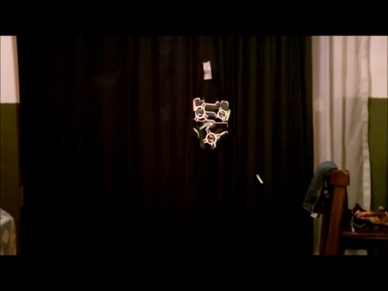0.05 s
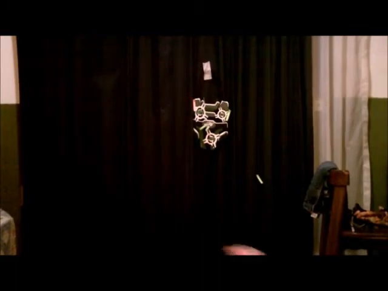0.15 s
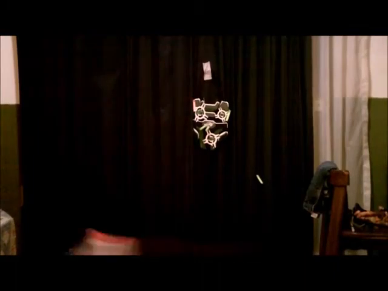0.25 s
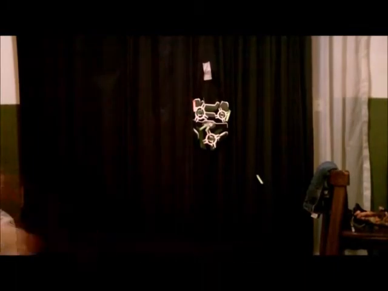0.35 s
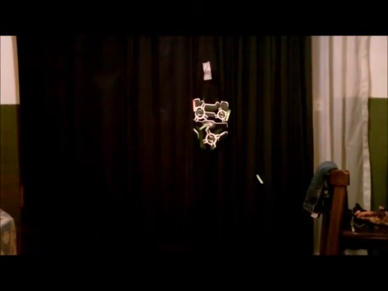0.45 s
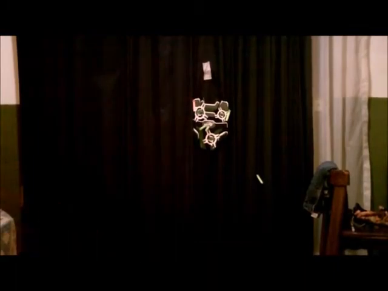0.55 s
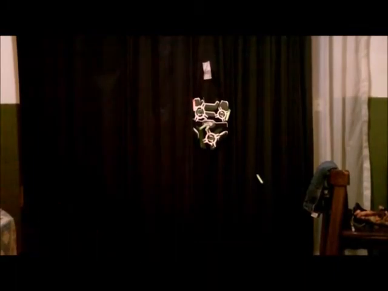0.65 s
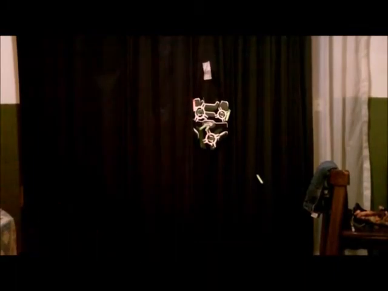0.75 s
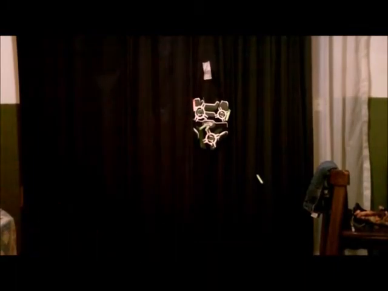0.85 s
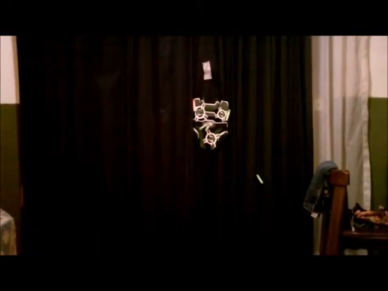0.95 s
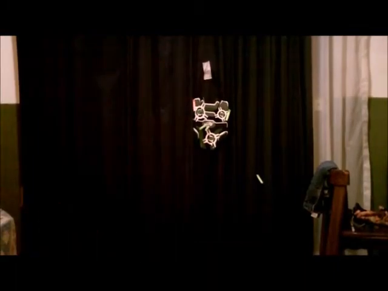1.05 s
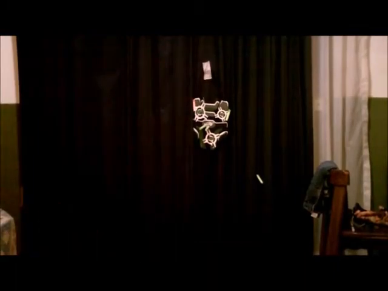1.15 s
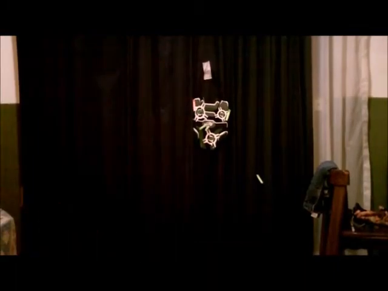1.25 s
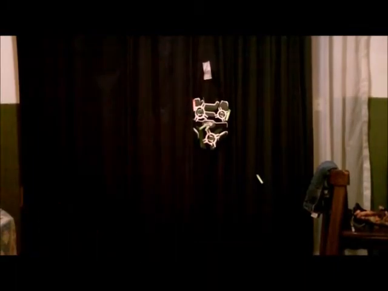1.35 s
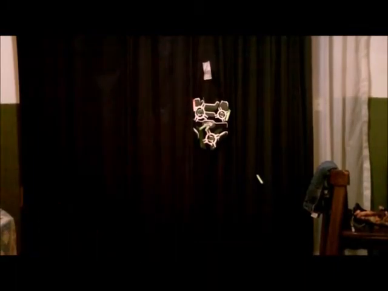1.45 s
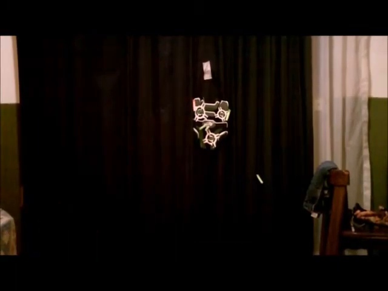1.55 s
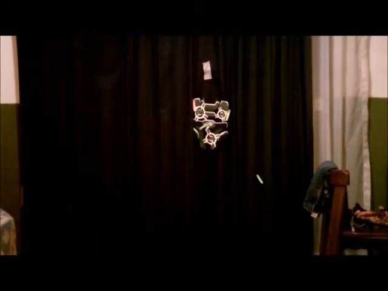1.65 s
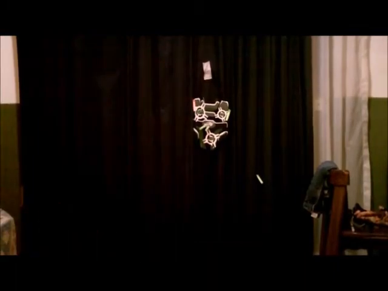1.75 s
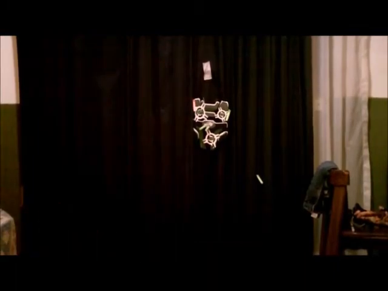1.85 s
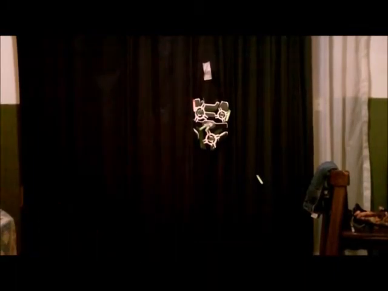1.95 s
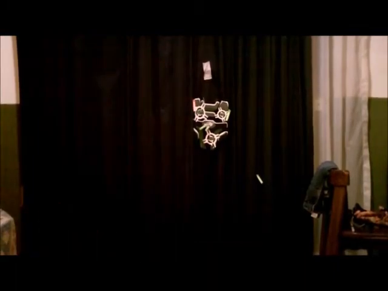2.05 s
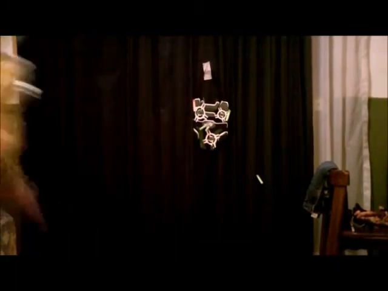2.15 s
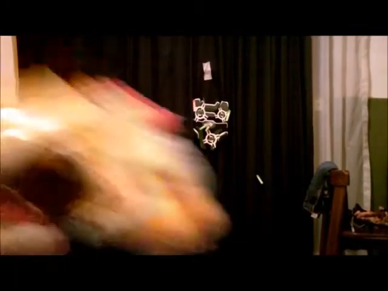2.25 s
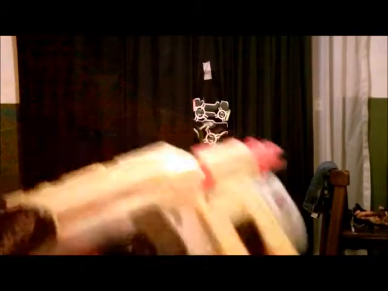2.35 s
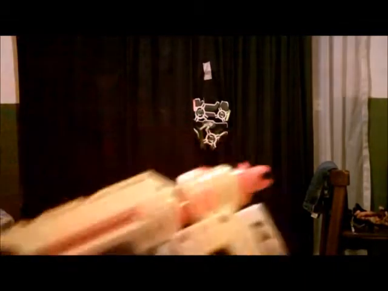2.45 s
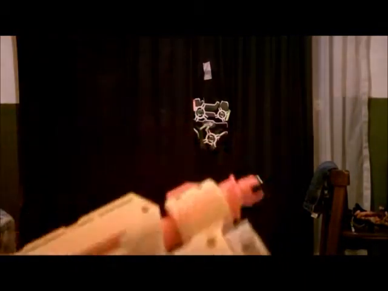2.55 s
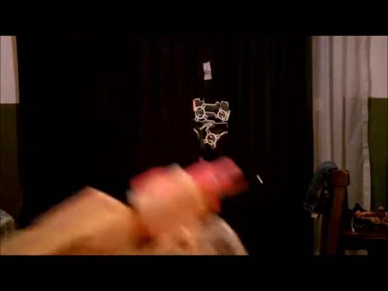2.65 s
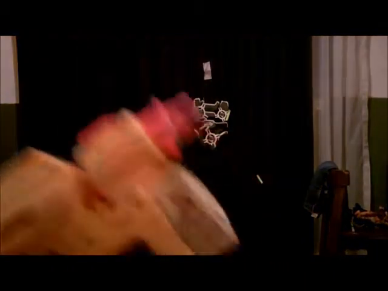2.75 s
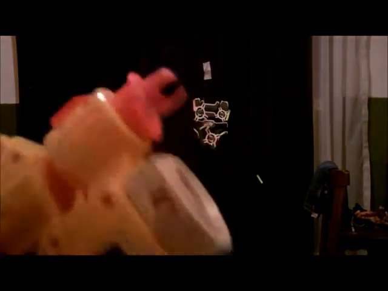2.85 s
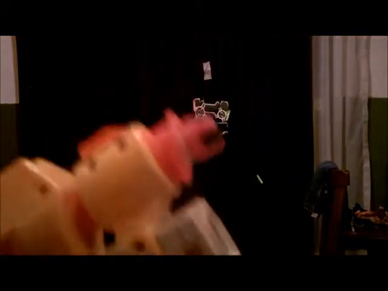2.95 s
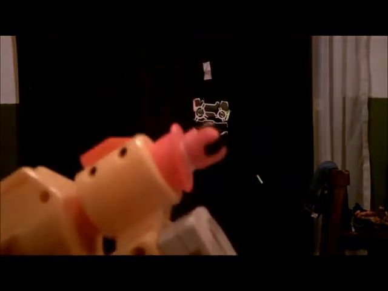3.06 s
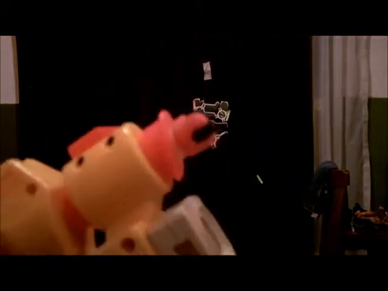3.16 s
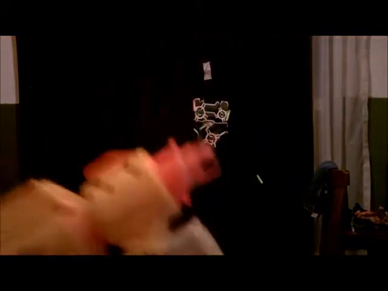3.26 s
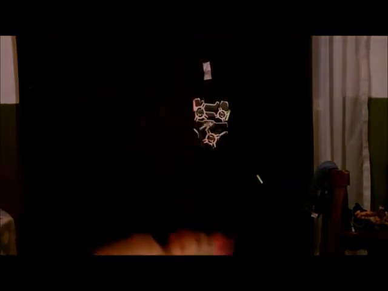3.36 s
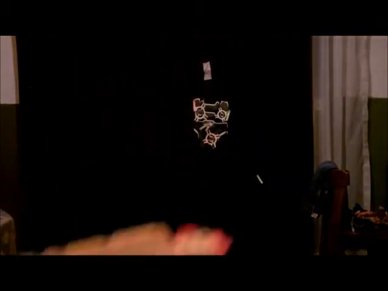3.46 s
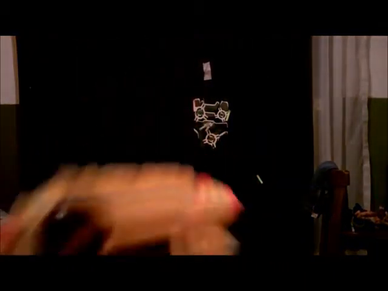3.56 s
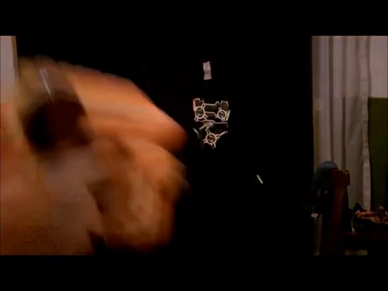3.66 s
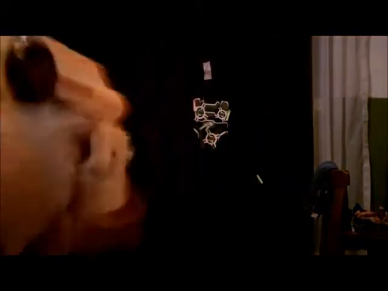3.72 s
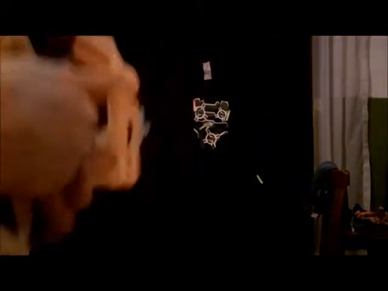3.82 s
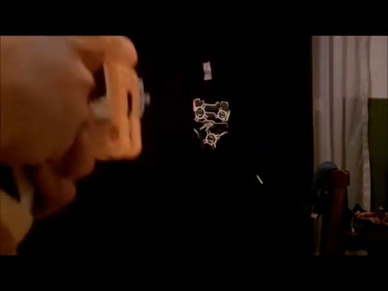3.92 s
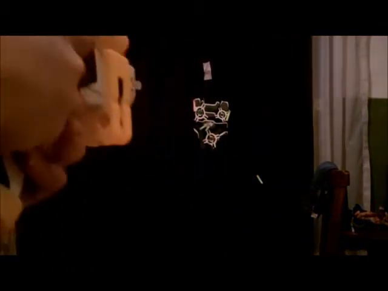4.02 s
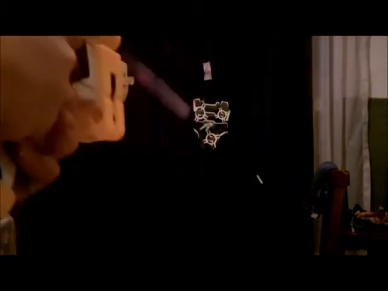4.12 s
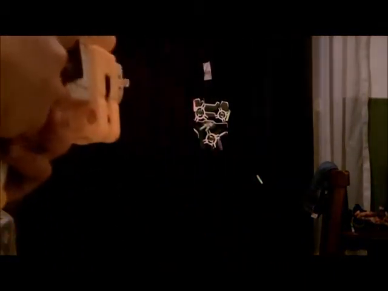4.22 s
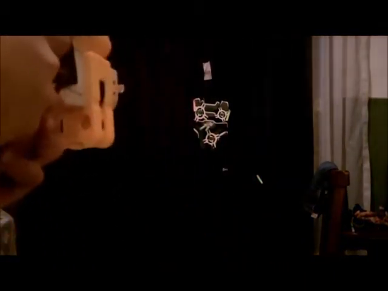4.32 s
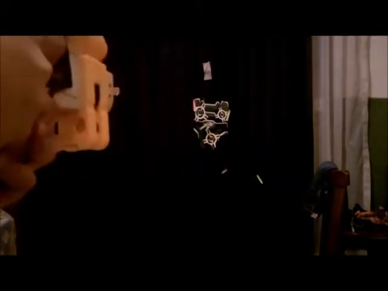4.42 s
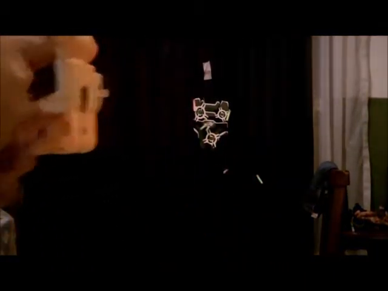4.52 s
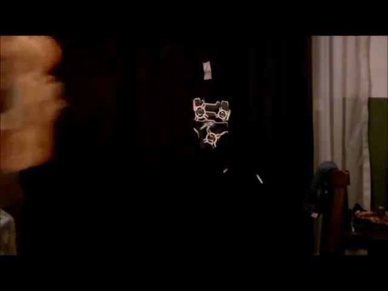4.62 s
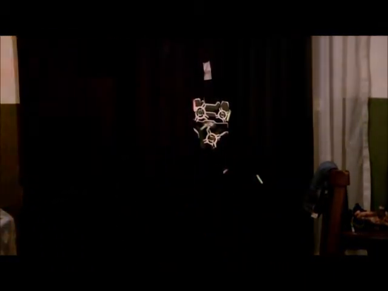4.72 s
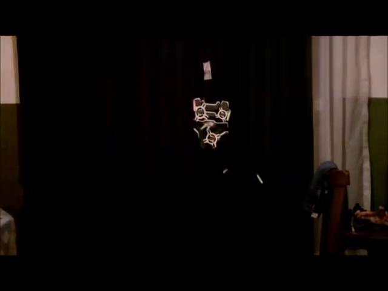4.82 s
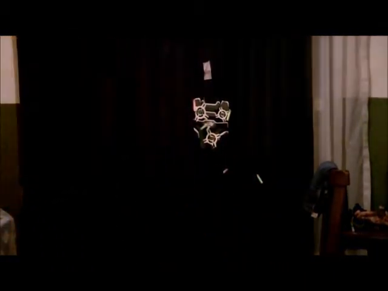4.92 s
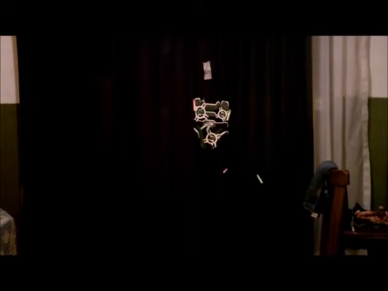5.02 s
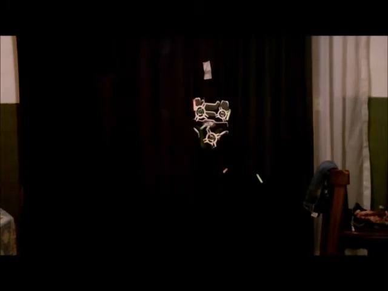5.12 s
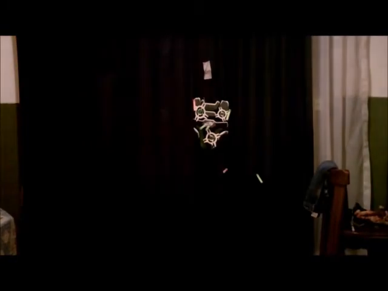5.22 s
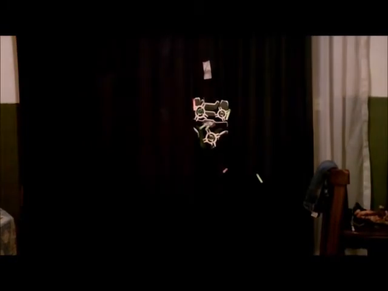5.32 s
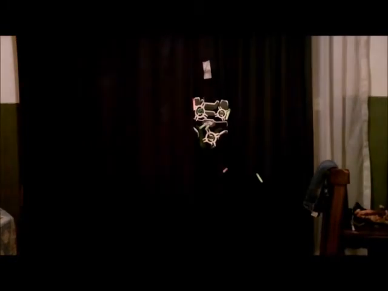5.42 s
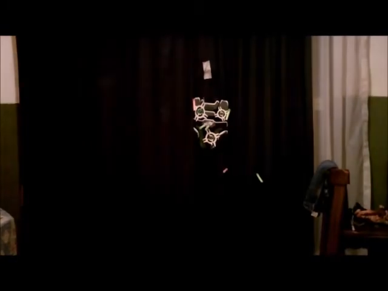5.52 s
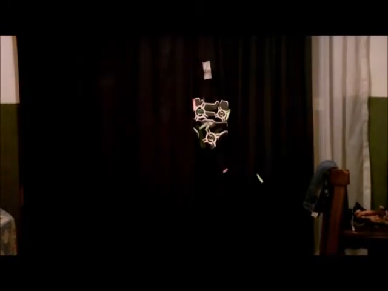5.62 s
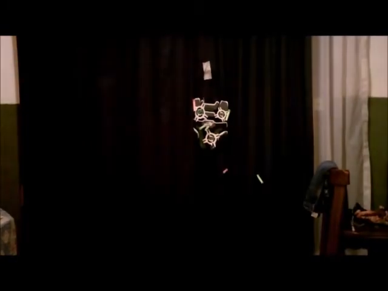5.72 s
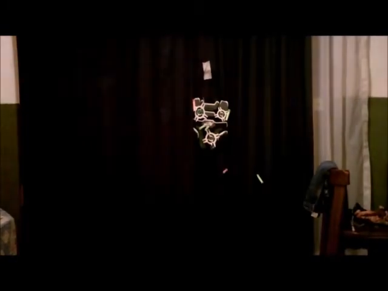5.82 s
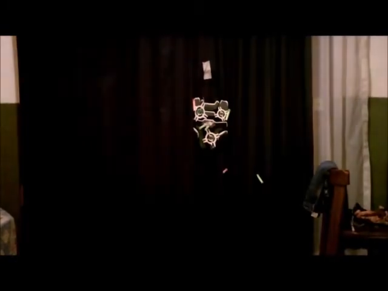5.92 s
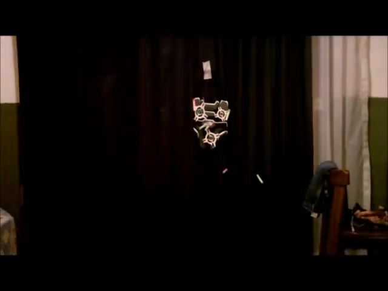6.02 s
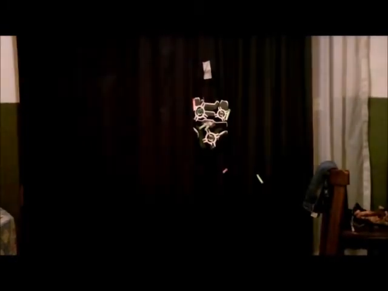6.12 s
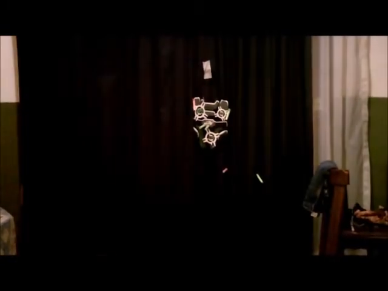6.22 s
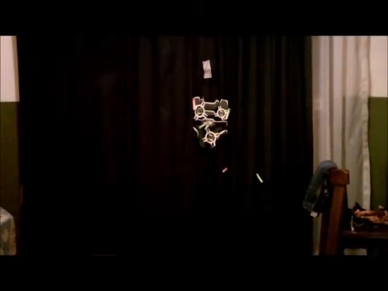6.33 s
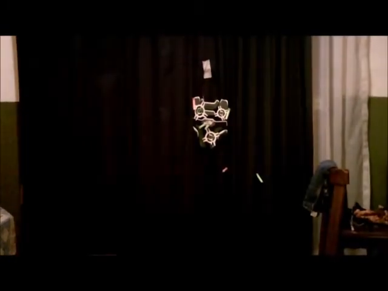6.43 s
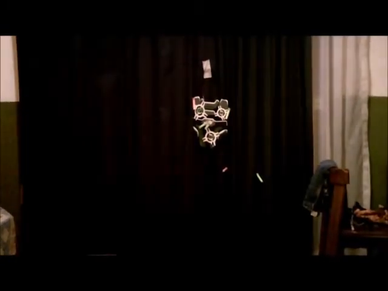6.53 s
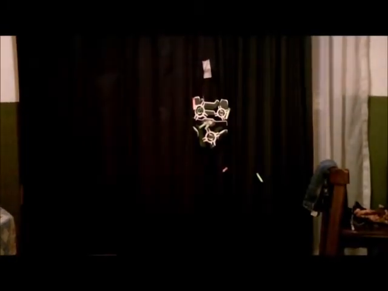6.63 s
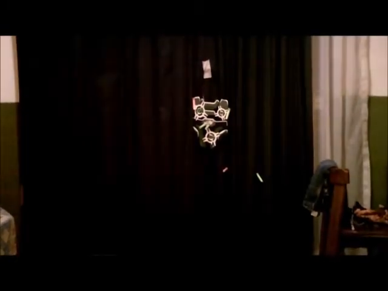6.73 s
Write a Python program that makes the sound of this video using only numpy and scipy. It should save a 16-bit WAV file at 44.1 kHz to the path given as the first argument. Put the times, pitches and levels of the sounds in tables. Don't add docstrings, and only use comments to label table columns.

```python
import sys
import numpy as np
from scipy import signal
from scipy.fft import rfft, irfft
from scipy.io import wavfile
from scipy.ndimage import uniform_filter1d

SR = 44100
rng = np.random.default_rng(int(sys.argv[2]) if len(sys.argv) > 2 else 0)


def file_out(sig):
    cols = np.atleast_2d(sig).T
    lim = np.clip(cols, -1, 1)
    pcm = np.round(lim * 32767).astype(np.int16)
    wavfile.write(sys.argv[1], SR, pcm)


def magnitude_from_level(level_db):
    exponent = np.asarray(level_db, float) / 20
    return 10 ** exponent


N = 298998

# (pitch_hz, level_db, t60_s)
WALLS = (2480, 6760, 7.7), [(4060, 3.5, 0.0039), (4440, -4.5, 0.02), (4725, 3, 0.017), (5123, 1.5, 0.013),
         (6160, -3.5, 0.0019), (6870, -0.5, 0.0019)]
CAVITY = (170, 920, 0), [(452, -10, 0.014), (680, -3, 0.082), (742.4, 9.5, 0.055), (822, 7, 0.018),
          (867, 2, 0.0089)]
PANEL = (1117, 2590, 1.9), [(1127, 1, 0.0092), (1493, -12, 0.041), (1615, -4.5, 0.0092),
         (1910, -10, 0.0075), (2150, -0.5, 0.0041)]
EDGE = (9950, 15100, 0), [(9260, -2.5, 0.0014)]
SKIN = (8000, 16500, -1.5), [(9820, 0, 0.0019)]
FINGER = (5600, 13000, 2), [(9700, -1, 0.002)]


def rms_one(x):
    return x / np.sqrt(np.mean(x ** 2) + 1e-20)


def at_hz(points, hz):
    points_hz, values = np.transpose(points)
    return np.interp(np.log(hz), np.log(points_hz), values)


def over_time(points):
    return np.interp(np.arange(N) / SR, *np.transpose(points))


def drift(rate_hz):
    r = np.exp(-2 * np.pi * rate_hz / SR)
    settled = signal.lfilter([1], [1, -2 * r, r * r], rng.standard_normal(N + SR))[SR:]
    return rms_one(settled)


def band(x, low_hz, high_hz):
    sos = signal.butter(3, [low_hz, min(high_hz, .45 * SR)], "band", fs=SR, output="sos")
    return signal.sosfilt(sos, x)


def ring(x, hz, t60_s):
    r = magnitude_from_level(-60 / (t60_s * SR))
    w = 2 * np.pi * hz / SR
    gain = np.sin(w) * np.sqrt(2 * (1 - r * r))
    return signal.lfilter([0, gain], [1, -2 * r * np.cos(w), r * r], x)


def shell_part(force, part, spread_db):
    (low_hz, high_hz, crack_db), modes = part
    chance = rng.standard_normal((len(force), len(modes)))
    out = magnitude_from_level(crack_db) * np.sqrt(SR / 2 / (high_hz - low_hz)) * force
    for k, (hz, level_db, t60_s) in enumerate(modes):
        out = out + magnitude_from_level(level_db + spread_db * chance[:, [k]]) * ring(force, hz, t60_s)
    return band(out, low_hz, high_hz)


def spread_out(sound):
    power = uniform_filter1d(np.abs(rfft(sound)) ** 2, size=48, axis=1)
    return np.roll(irfft(np.sqrt(np.abs(power))), shift=200, axis=1)


def knocks(rows, parts, swell):
    rows = np.array(rows)
    t = np.arange(6000) / SR
    age = t * 1000 / np.clip(rows[:, -1:], .3, 30)
    force = rng.standard_normal(age.shape)
    if swell:
        uneven = magnitude_from_level(1.5 * rng.exponential(1, age.shape))
        force = force * uneven * age ** 2 * np.exp(-age ** 2 / 2)
    else:
        force = force * np.exp(-age) * (1 - np.exp(-t / 0.0004))
    force = force + 1e-18
    sound = 0
    for k, part in enumerate(parts):
        rung = shell_part(force, part, spread_db=2.5)
        peak = np.abs(rung).max(axis=1, keepdims=True)
        sound = sound + magnitude_from_level(rows[:, [k + 1]]) * rung / peak
    to_room = sound if swell else spread_out(sound)
    out = np.zeros((2, N + len(t)))
    for start_s, *pair in zip(rows[:, 0], sound, to_room):
        i = round(start_s * SR)
        out[:, i:i + len(t)] += pair
    return out[:, :N]


def by_part(rows, panel_share, panel_db):
    start_s, db, weight_db, sharp_db, ms = np.transpose(rows)
    panel = db + panel_share * weight_db + panel_db
    return np.transpose([start_s, db, db + weight_db, panel, db + sharp_db, ms])


def background():
    # pitch_hz, level_db per Hz
    quiet = [(12, -41.5), (20, -2.5), (60, -5.5), (86, -6), (142, -9.5), (293, -15), (499, -22), (976, -24),
             (2670, -33.5), (3950, -29), (5530, -37.5), (13500, -40.5), (16000, -51)]
    # time_s, rumble_db
    sway = [(0.0, -63), (0.15, -62.5), (0.28, -65), (0.91, -65), (1.79, -62), (1.94, -64.5), (2.19, -65),
            (2.98, -63), (3.12, -63.5), (4.17, -62.5), (4.36, -56), (4.55, -63), (4.7, -66), (5.19, -64),
            (5.51, -58), (5.85, -65.5), (6.16, -64), (6.78, -58.5)]
    # time_s, level_db
    whine_db = [(0, -75), (1, -82), (1.3, -89.5), (4.3, -81), (4.5, -62), (5.3, -70), (5.42, -80),
                (5.701, -81), (6.78, -85)]
    # time_s, level_db
    hum_db = [(0, -90), (5.7, -90), (5.95, -71), (6.6, -70), (6.78, -75)]
    hz = np.maximum(np.fft.rfftfreq(N, 1 / SR), 1)
    noise = rms_one(irfft(rfft(rng.standard_normal(N)) * magnitude_from_level(at_hz(quiet, hz)), N))
    rumble = band(noise, 12, 180)
    lumps = magnitude_from_level(over_time(sway) + 63.5 + 2.9 * drift(4))
    hiss = magnitude_from_level(-75) * rms_one(band(rng.standard_normal(N), 11000, 15000))
    whine = magnitude_from_level(over_time(whine_db)) * rms_one(ring(rng.standard_normal(N), hz=1004, t60_s=0.45))
    hum = magnitude_from_level(over_time(hum_db)) * rms_one(ring(rng.standard_normal(N), hz=252, t60_s=0.3))
    return magnitude_from_level(-59.5) * (noise + rumble * (lumps - 1)) + whine + hum + hiss


def bedroom(x):
    # pitch_hz, t60_s
    decay = [(150, 0.13), (600, 0.34), (2000, 0.39), (5000, 0.26), (10000, 0.25), (15000, 0.11)]
    t = np.arange(SR // 2) / SR
    edges_hz = 120 * 2 ** np.arange(0, 7.5, .5)
    echoes = np.zeros(len(t))
    for low_hz, high_hz in zip(edges_hz, edges_hz[1:]):
        t60_s = at_hz(decay, np.sqrt(low_hz * high_hz))
        echoes += band(rng.standard_normal(len(t)), low_hz, high_hz) * magnitude_from_level(-60 * t / t60_s)
    echoes = echoes * np.clip((t - .001) / 0.0054, 0, 1)
    return signal.fftconvolve(x, echoes / np.sqrt(np.sum(echoes ** 2)))[:N]


def thumps():
    # start_s, peak_db, pitch_hz
    pushes = [(1.829, -40, 33), (3.847, -65, 101.5), (4.198, -15, 135), (4.2, -31, 270), (4.42, -26, 202),
              (5.39, -31, 115.4), (5.445, -38, 79.2), (5.556, -30, 192), (6.172, -35, 117.6),
              (6.431, -43, 31.8), (6.719, -38, 88)]
    t = np.arange(4096) / SR
    out = np.zeros(N + len(t))
    for start_s, peak_db, hz in pushes:
        i = round(start_s * SR)
        out[i:i + len(t)] += magnitude_from_level(peak_db - 4) * np.sin(2 * np.pi * hz * t) * np.exp(-t * hz / 0.9)
    return out[:N]


def rub_gains(db, weight_db, skin_db):
    panel_db = db + 0.31 * weight_db - 2.5
    return magnitude_from_level(np.array([db, db + weight_db, panel_db, 0.66 * db + skin_db]))


def rubbing():
    # time_s, pressure_db of the walls, weight_db
    grip = [(0, -77.5, 5), (.35, -66, -20), (.56, -69.5, -16), (.92, -64.5, -5), (1.2, -118, 11),
            (1.35, -52.5, -25), (1.45, -72, -4), (1.85, -70, 1), (2.19, -70, -2), (2.32, -69, -3),
            (2.43, -81, 7), (2.68, -77, 8), (2.95, -80, -4), (4.13, -93, 14), (4.86, -63, -9.5),
            (5.26, -94.5, 22), (6.3, -66.5, -1.5), (6.78, -53.5, -10.5)]
    # start_s, length_s, walls_db, weight_db, release_t60_s
    drags = [
        (3.386, 0.16, -42, -13.5, 0.11),
        (3.514, 0.0087, -55, -4.5, .6),
        (4.208, 0.064, -31.5, -15.5, 0.29),
        (4.413, 0.03, -42, 0.1, 0.35),
        (5.445, 0.075, -37, -10, 0.1),
        (5.538, 0.065, -41, -4.5, 0.42),
        (6.331, 0.33, -62.5, -26, 0.5),
    ]
    # low_hz, high_hz, bare_crack_db, then modes pitch_hz, level_db, t60_s
    palm = (240, 710, 0), [(496, -9, 0.011)]
    t = np.arange(N) / SR
    time_s, pressure_db, grip_weight_db = np.transpose(grip)
    gains = rub_gains(np.interp(t, time_s, pressure_db), np.interp(t, time_s, grip_weight_db), skin_db=-32.5)
    shake = magnitude_from_level(-3.5) * gains[0] * rms_one(band(rng.standard_normal(N), 15, 140))
    for start_s, length_s, db, weight_db, t60_s in drags:
        late = t - start_s - length_s
        swell_db = np.where(late < 0, 6.5 * late / length_s, -60 * late / t60_s).clip(-200, 0)
        gains = gains + (t > start_s) * rub_gains(db + swell_db, weight_db, skin_db=-33.5)
    clumps_db = 2.7 * rng.exponential(1, N) + 2.2 * drift(63) + 0.49 * drift(5.3)
    slips = rng.standard_normal(N) * magnitude_from_level(clumps_db)
    out = shake
    for part, gain in zip([WALLS, palm, PANEL, SKIN], gains):
        out = out + gain * rms_one(shell_part(slips[None], part, spread_db=0)[0])
    return out


def skin_strokes():
    # start_s, walls_peak_db, weight_db, sharpness_db, swell_ms
    strokes = [(.17, -45, -30, -0.5, 13), (.24, -52, -29, -19, 6.3), (.355, -43, -35, 3, 21.8),
               (.48, -49.5, -38, 4, 17), (1.26, -50.5, -19, -9, 20), (1.325, -43, -14, -20, 15.4),
               (2.098, -36, -34, -5, 12.4), (2.148, -43, -20, -12, 14), (1.158, -49, -24, -8, 3.7),
               (2.27, -41, -23, -12, 17), (2.6, -53, -5, -12, 22.4), (3.757, -36.5, -12, -12.5, 7.7),
               (3.49, -42, -26, -10, 34), (4.89, -42.5, -16, -11.5, 19.7)]
    rows = by_part(strokes, panel_share=0.53, panel_db=3.9)
    return knocks(rows, [WALLS, CAVITY, PANEL, FINGER], swell=True)


def slide_rails():
    # low_hz, high_hz, bare_crack_db, then modes pitch_hz, level_db, t60_s
    rails = [
        ((3000, 5200, -8), [(3420, 3, .012), (3800, -3, .01), (4800, 0, .01)]),
        ((5600, 7600, -6), [(5950, 3, .012), (6500, -2, .008), (7100, -4, .006)]),
    ]
    # start_s, low_rail_peak_db, high_rail_db, swell_ms
    runs = [
        (3.41, -46, -45, 14),
        (3.433, -40, -45, 10),
        (3.478, -29, -32, 11),
        (3.5, -30, -30, 10),
        (3.518, -34, -35, 9.3),
        (3.565, -39, -46, 12),
        (4.208, -40, -25, 14),
        (4.24, -40, -31, 25),
        (1.72, -44, -55, 12),
    ]
    # start_s, low_rail_db, high_rail_db, edge_db, contact_ms
    small_ticks = [(3.3823, -32, -32, -40, 1.7), (3.4168, -45, -45, -50, 1.5), (3.4377, -40, -44, -52, 1.5),
                   (3.4462, -40, -42, -52, 1.5), (3.4672, -30, -22, -24, 2), (4.2005, -30, -11, -32, 1.5),
                   (2.252, -44, -50, -55, 1.5), (6.2492, -55, -60, -62, 3), (6.333, -59, -57, -56, 3),
                   (6.3655, -48, -54, -58, 3), (6.385, -58, -57, -52, 5), (6.4647, -51, -58, -60, 3),
                   (6.5056, -50, -58, -62, 3), (6.545, -60, -54, -62, 3), (6.608, -54, -54, -49, 7),
                   (6.6413, -56, -44, -60, 3), (6.683, -58, -56, -52, 3)]
    # start_s, peak_db, swell_ms
    hisses = [
        (4.215, -36, 20),
        (4.275, -39, 28),
        (6.32, -60, 30),
        (6.44, -60, 30),
        (6.57, -60, 28),
        (6.69, -52, 25),
    ]
    out = knocks(runs, rails, swell=True)
    out = out + knocks(small_ticks, [*rails, FINGER], swell=False)
    return out + knocks(hisses, [SKIN], swell=True)


def magazine_catch():
    # (the first, at 1.78 s, is a handling knock through the same parts)
    releases = [(1.7776, -21.5, -21.5), (4.61, -58, -40.5), (4.6294, -69, -43.5), (4.646, -40.5, -26),
                (4.6659, -45, -25), (4.686, -58, -37), (4.7, -28, -31), (5.1488, -60.5, -51.5),
                (5.164, -45, -50), (5.1764, -52, -43.5), (5.1853, -40, -39.5), (5.198, -55, -46),
                (5.2065, -44, -42), (5.2428, -55, -46), (5.2617, -45.5, -48), (5.2907, -38.5, -53)]
    # start_s, pawl_peak_db, tongue_db, swell_ms
    slips = [
        (2.076, -48, -49, 10),
        (2.1, -36.5, -45.5, 14),
        (5.165, -58, -44.5, 35),
    ]
    # low_hz, high_hz, bare_crack_db, then modes pitch_hz, level_db, t60_s
    pawl = (3600, 6000, 3.5), [(3695, 3.5, 0.033), (4090, 2, 0.0061), (4830, 2.5, 0.003)]
    tongue = (1390, 2450, -4), [(1650, -1.5, 0.0092), (1920, 2.2, 0.0063)]
    contact_ms = 1.48
    ticks = knocks([(*row, contact_ms) for row in releases], [pawl, tongue], swell=False)
    return ticks + knocks(slips, [pawl, tongue], swell=True)


def ringing_notes():
    # start_s, peak_db, pitch_hz, t60_s
    tones = [(1.715, -38, 1190, .03), (2.165, -42, 735, 0.09), (2.678, -42, 1600, 0.045),
             (2.791, -38, 680, 0.048), (2.791, -38.5, 1110, 0.053), (3.389, -35.5, 710, 0.032),
             (3.551, -28, 790, 0.053), (3.459, -29.5, 3500, .015), (3.643, -32, 4550, .015),
             (3.643, -37, 1500, 0.021), (3.552, -24, 2480, 0.017), (4.199, -17, 890, .03),
             (4.42, -25, 702, 0.038), (4.422, -25.5, 440, 0.068), (4.42, -28.5, 285, .04),
             (5.387, -33, 930, 0.034), (5.41, -33, 960, .03), (5.41, -36, 780, .03),
             (5.449, -17.5, 598, .03), (5.449, -22, 850, .035), (5.557, -19, 467, .04),
             (5.557, -22.5, 312, 0.048), (5.577, -23.5, 485, 0.043), (6.64, -53, 910, .04),
             (4.421, -24, 720, .045), (4.587, -46, 1600, .015), (4.824, -46, 1320, .03),
             (5.291, -43, 4150, .03), (5.245, -50, 1620, .15), (4.436, -31, 480, .25), (4.45, -32, 640, .2),
             (4.47, -37, 730, .1), (4.43, -36, 380, .2), (5.462, -34, 1130, .2), (5.478, -29, 620, .05),
             (5.466, -30, 820, .1), (5.503, -29, 600, .05), (5.507, -32, 1150, .04),
             (5.578, -30, 1030, .03), (5.597, -30, 530, .06), (5.61, -35, 1280, .05),
             (5.558, -28, 1050, .02), (3.764, -39.5, 1300, 0.032), (4.199, -14, 1448, 0.071),
             (4.835, -33, 1214, 0.029), (5.388, -13.5, 1723, 0.012), (3.4678, -5, 5450, 0.018),
             (3.4673, -8.5, 5970, 0.015), (5.557, -13, 4020, .02), (4.2, -5, 4890, 0.017)]
    t = np.arange(6000) / SR
    build = 1 - np.exp(-t / 0.00071)
    out = np.zeros(N)
    for start_s, peak_db, hz, t60_s in tones:
        i = round(start_s * SR)
        out[i:i + len(t)] += magnitude_from_level(peak_db - 60 * t / t60_s) * np.sin(2 * np.pi * hz * t) * build
    return out


def wood_bumps():
    # start_s, top_peak_db, weight_db, sharpness_db, contact_ms
    bumps = [
        (4.4148, -38.5, 0, -1, 6.6),
        (4.4204, -19, -6, -8, 2.8),
        (4.4458, -20, -27, -22, 3.1),
        (5.409, -26.5, -13, -15, 3.9),
        (5.4486, -15, -13, -14.5, 7.6),
        (5.4889, -26.5, -9, -35, 3.7),
        (5.5071, -26, -10, -15, 6.9),
        (5.533, -38, 3, -22, 3.2),
        (5.5573, -8.5, -19, -15.5, 6),
        (5.5791, -18, -7, -13.5, 3.7),
    ]
    # low_hz, high_hz, bare_crack_db, then modes pitch_hz, level_db, t60_s
    top = (3220, 6010, 5.8), [(3390, -3, 0.0078), (4140, -1.7, 0.013), (4700, 1, 0.0035)]
    wood = (263, 1160, 1.96), [(323, -13, 0.053), (449, 2.5, 0.2), (548, 9, 0.072), (627, 14.5, 0.015),
            (820, 3, 0.027)]
    rows = by_part(bumps, panel_share=0.45, panel_db=-4)
    return knocks(rows, [top, wood, PANEL, EDGE], swell=False)


def spring():
    # start_s, level_db, pitch share of the modes, pitch share of the second order
    slaps = [(4.206, -19, 1.04, .98), (4.221, -21, 1.01, .98), (4.237, -18, 1.02, 1.0),
             (4.246, -21, 1.01, 1.0), (4.262, -24, .98, 1.03), (4.271, -24, 0.99, 1.05),
             (4.281, -25, 1.03, 1.04), (4.294, -24.5, 0.97, 1.03), (4.305, -28, .97, 1.01),
             (4.33, -36.5, 1.04, 1.02), (4.345, -36, .96, 1.05), (4.375, -41.5, .96, 1.0),
             (4.39, -42.5, .96, 1.0)]
    # pitch_hz, level_db, t60_s
    tube = [(690, -10, .04), (758, 5, 0.07), (804, 4, 0.07), (880, -7.5, 0.04), (1180, -9.5, 0.04),
            (1250, -10.5, .03), (1468, 2.5, 0.05), (4017, 1.5, .025), (4740, -6.5, .025), (4920, -6, .025),
            (4970, -8.5, 0.02)]
    upper_from_hz = 1350
    t = np.arange(4096) / SR
    out = np.zeros(N)
    for start_s, db, low_share, upper_share in slaps:
        i = round(start_s * SR)
        puffs = np.exp(-t / 0.0037) * rng.standard_normal((len(tube), len(t))) + 1e-18
        for puff, (hz, mode_db, t60_s) in zip(puffs, tube):
            second_order = upper_from_hz < hz < 2 * upper_from_hz
            rung = ring(puff, hz * (upper_share if second_order else low_share), t60_s)
            out[i:i + len(t)] += magnitude_from_level(db + mode_db - 6.5) * rung / np.abs(rung).max()
    return out


def shell_knocks():
    # start_s, walls_peak_db, weight_db (cavity against walls), sharpness_db (edge against walls), contact_ms
    handling = [(0.5821, -42.5, -16, -9, 1.8), (0.6419, -29.5, -25.5, -14, 5.5),
                (0.8094, -52, -4.5, -12, 8.9), (1.1707, -36.5, -20.5, -17, 3.7),
                (1.3379, -43, -19, -11, 13), (1.3788, -35.5, -14, -22, 4.3), (1.4456, -46.5, -7.5, -10, 4),
                (1.4915, -42.5, -14, -23, 2.4), (1.5214, -34, -20, -14, 2.2), (1.7145, -29, -19, -40, 1.8),
                (1.7774, -25, -10.5, -12.5, 6.2), (2.164, -29, -18, -13, 6.2), (2.2553, -46, -30, -7, 10),
                (2.2887, -36, -34, -11, 1.7), (2.3186, -40, -26, -10, 1.9), (2.3381, -43, -12, -12, 1.8),
                (2.4274, -48, -18, -16, 7.2), (2.4653, -26, -25, -13, 2), (2.6764, -39.5, -8.5, -16, 5.6),
                (2.7901, -37.5, -11.5, -19, 4.3)]
    cocking = [(3.3388, -41, -14.5, -33, 1.9), (3.357, -45.5, 0, -23, 4.7), (3.3673, -32.5, -8.5, -13, 2.1),
               (3.3822, -46.5, 15, 12.5, 4.4), (3.3885, -28, -14.5, -24, 1.3), (3.4583, -29, -11, -8, 7.5),
               (3.4676, -4, -34, -8.5, 2.4), (3.478, -37, 9.5, -10, 1.2), (3.5511, -10.5, -28.5, -20.5, 2),
               (3.6357, -40, -17, -7, 1.4), (3.6422, -29, -18.5, -14, 3.5), (3.8086, -21, -27.5, -14, 1.9),
               (3.82, -28, -15.5, -11, 2.4), (3.828, -50.5, -17, 10, 2.1), (3.901, -43, -14, 5, 2),
               (3.9105, -43, -4.5, -23, 3.9), (3.9973, -29.5, -33.5, -7.5, 1.04)]
    shot = [
        (4.1526, -25, -18.5, -23, 1.6),
        (4.160, -17.5, -20, -14, 2.6),
        (4.174, -29, -13, -14, 2.1),
        (4.1978, -11.5, -2.5, -13.5, 0.99),
        (4.1998, -1.5, -13.5, -10.5, 1.3),
        (4.2052, -2.5, -15.5, -3, 1.5),
        (4.212, -20, -1.5, -14.5, 1.8),
        (4.221, -20.5, -7.5, -12, 1.2),
        (4.238, -27, 4, -16, 1.6),
    ]
    reloading = [(4.5747, -38, -13, -2, 1.1), (4.7617, -38.5, -17, -10.5, 4), (4.9244, -43.5, -24, -4, 2.9),
                 (4.967, -37, -13, -16, 6.1), (4.988, -42, -12, -27, 7.3), (5.3831, -27, -21, -30, 2.8),
                 (5.389, -21, -13.5, -18.5, 6.3), (5.8106, -38.5, -19, -33, 4.9),
                 (5.83, -43.5, -10, -31.5, 2.4), (6.1178, -53, 1, -20.5, 2.9), (6.1737, -51, -3, -8, 2.2),
                 (6.4266, -61, 11.5, -1, 2.9), (6.6461, -44, -32, -17, 1.5),
                 (6.6917, -25.5, -32, -40, 0.98), (6.7131, -39, -10, -18, 3.3)]
    loose = by_part(handling + cocking + reloading, panel_share=0.56, panel_db=1.7)
    gripped = by_part(shot, panel_share=0.48, panel_db=-4)
    return knocks([*loose, *gripped], [WALLS, CAVITY, PANEL, EDGE], swell=False)


def to_mic_and_room(sound, room_db):
    return sound * magnitude_from_level(np.array([[0], [room_db]]))


def scene():
    pair = shell_knocks() + skin_strokes() + wood_bumps() + slide_rails()
    pair = pair + to_mic_and_room(magazine_catch() + ringing_notes(), room_db=-6)
    pair = pair + to_mic_and_room(spring(), room_db=-10)
    direct, feed = pair
    return (direct + magnitude_from_level(-10.5) * bedroom(feed) + rubbing() + thumps() + background())[None]


def housing(x):
    # pitch_hz, width_hz, depth_db
    notches = [(2710, 696, -25), (5480, 410, -12), (7940, 1070, -24), (11040, 910, -28)]
    for hz, width_hz, depth_db in notches:
        middle = -2 * np.cos(2 * np.pi * hz / SR)
        a = np.pi * width_hz / SR
        depth = a * magnitude_from_level(depth_db)
        x = signal.lfilter([1 + depth, middle, 1 - depth], [1 + a, middle, 1 - a], x)
    return signal.sosfilt(signal.cheby2(10, 22.5, 15250 + 250, fs=SR, output="sos"), x)


def gain_control(x):
    threshold_db, share, attack_s, release_db_per_s = -21, 0.3, 0.0092, 116.5
    level_db = 10 * np.log10(uniform_filter1d(x ** 2, size=64) + 1e-12)
    over_db = np.maximum(level_db - threshold_db, 0)
    climb_db = release_db_per_s * np.arange(N) / SR
    held_db = np.maximum(np.maximum.accumulate(over_db + climb_db, axis=1) - climb_db, 0)
    r = np.exp(-1 / (attack_s * SR))
    return x * magnitude_from_level(-share * signal.lfilter([1 - r], [1, -r], held_db))


def top_cut(x):
    return signal.sosfilt(signal.butter(12, 16640, fs=SR, output="sos"), x)


def record(dry):
    mix = np.clip(gain_control(housing(dry)), -1, 1)
    return top_cut(mix)


dry = scene()
out = record(dry)
file_out(out)
```